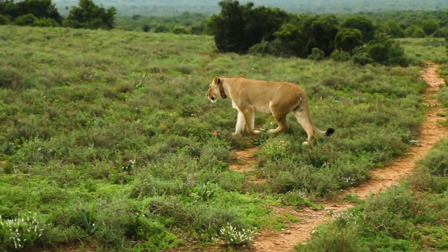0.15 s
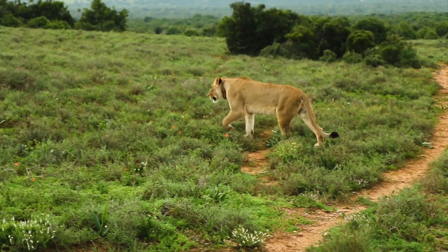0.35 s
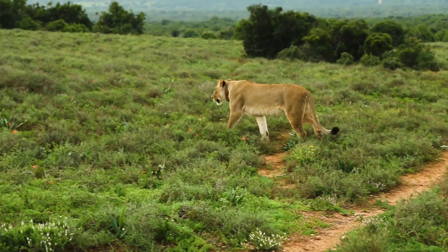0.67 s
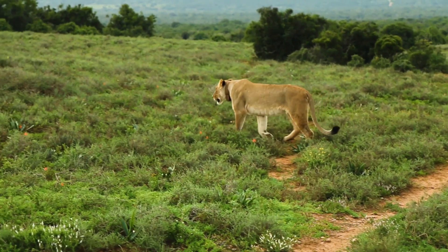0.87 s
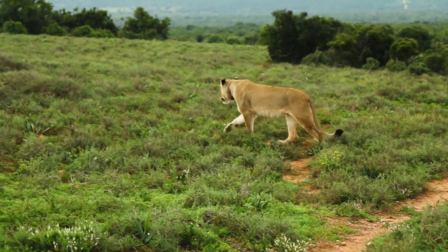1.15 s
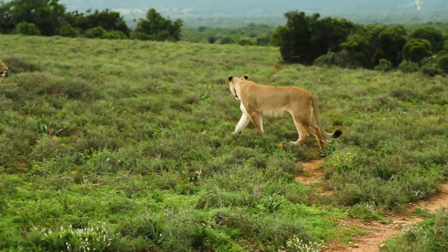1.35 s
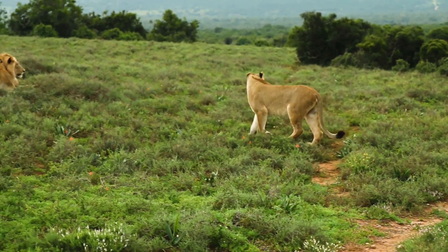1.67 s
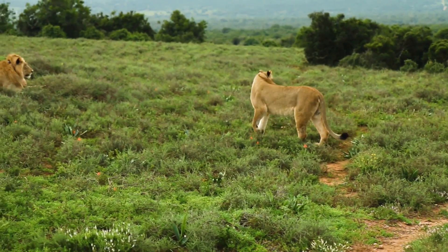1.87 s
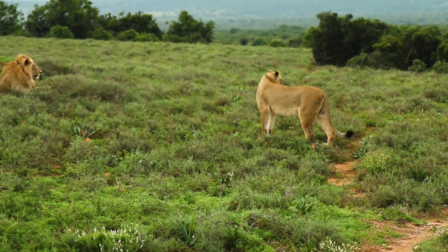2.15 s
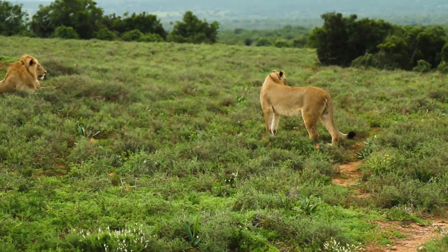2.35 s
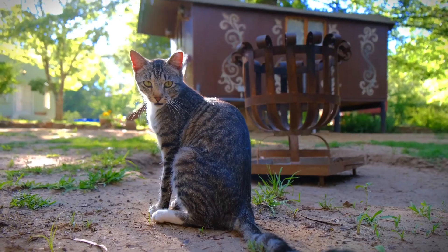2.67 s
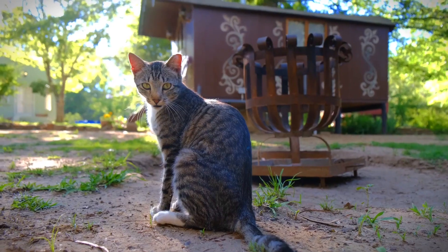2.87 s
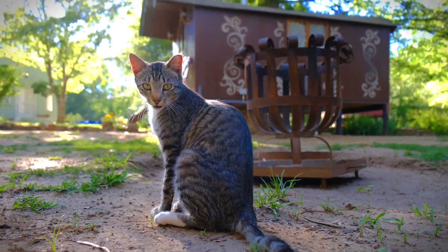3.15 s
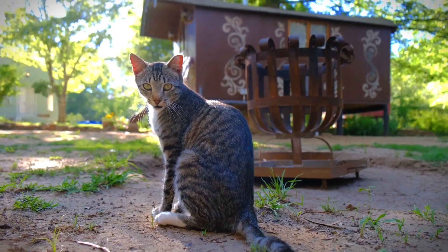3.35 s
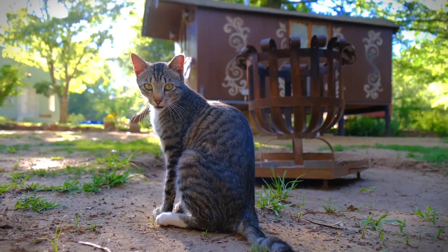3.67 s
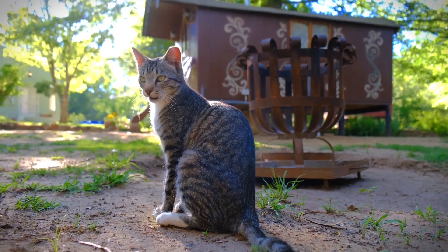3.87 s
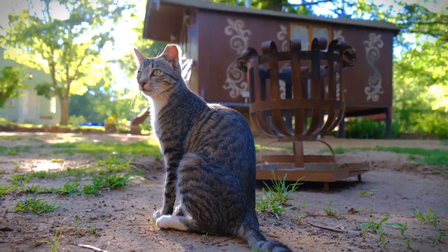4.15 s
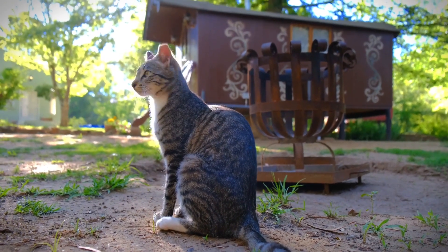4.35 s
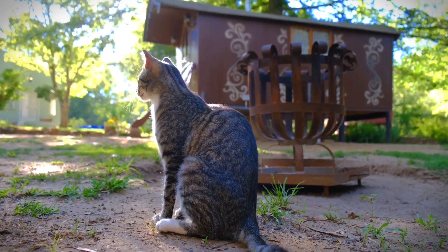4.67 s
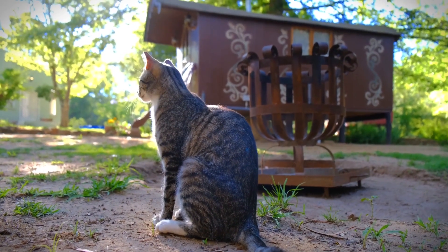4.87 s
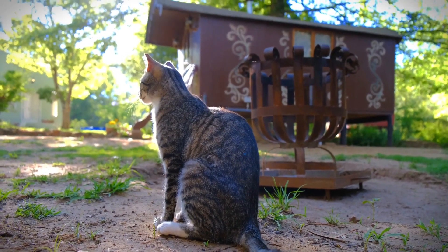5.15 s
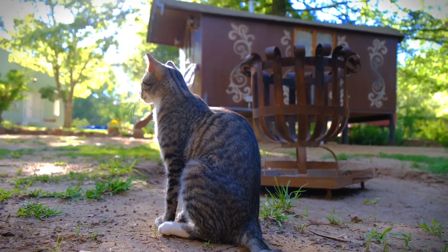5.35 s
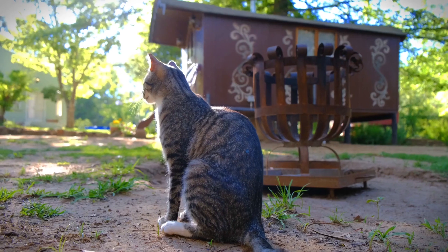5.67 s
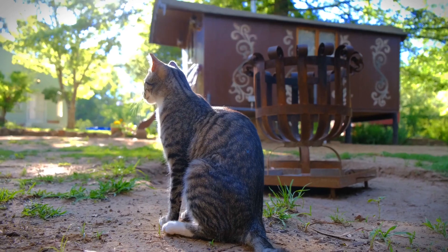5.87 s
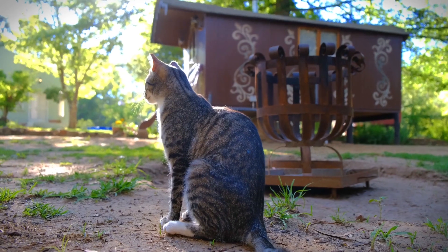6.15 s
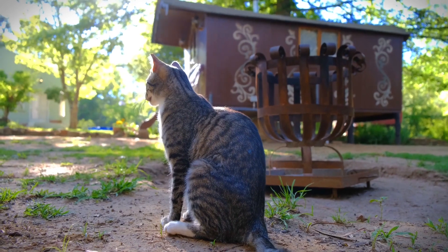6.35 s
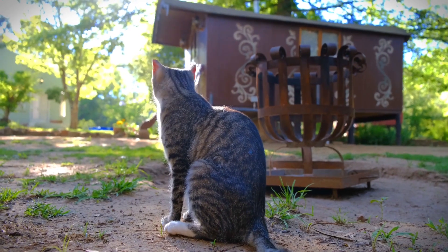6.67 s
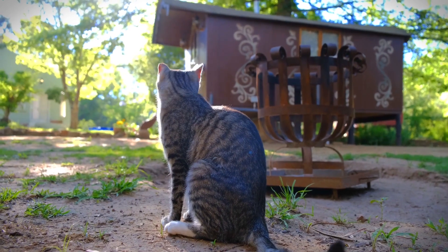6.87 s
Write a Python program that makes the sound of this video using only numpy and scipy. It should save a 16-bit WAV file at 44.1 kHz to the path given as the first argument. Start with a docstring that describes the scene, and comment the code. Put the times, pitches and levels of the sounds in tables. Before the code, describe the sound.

Close, dry growling from a large lioness: rapid fold flutter, hard slaps and noisy breathy rasp, drifting from the right ear to the left. It dies in separate flaps, then a clear gap. A small cat follows in the middle with two drawn-out, slightly hoarse meows, a pause between them, over gated low hum and gentle outdoor hiss.

```python
"""A lion growls twice while moving from right to left: slack folds flapping about 37-51 times a second
pulse the chest resonances and noise in throat and muzzle; hard slaps and three loose flaps are added.
A cat then gives two long meows in the centre, harmonics swept by a mouth resonance, each with an echo.
A low outdoor background of hum, rumble and soft hiss comes and goes with each meow."""
import sys
import numpy as np
from scipy import signal
from scipy.fft import rfft, irfft
from scipy.io import wavfile
from scipy.ndimage import uniform_filter1d, map_coordinates

SR = 44100
rng = np.random.default_rng(int(sys.argv[2]) if len(sys.argv) > 2 else 0)


def dump_mix(stems):
    """Bounce the given channels to the path in sys.argv[1] as a 16-bit WAV at rate SR."""
    frames = np.atleast_2d(stems).T  # one column per channel
    limited = np.clip(frames, -1, 1)  # hard clip at full scale
    pcm = np.round(limited * 32767).astype(np.int16)
    wavfile.write(sys.argv[1], SR, pcm)


N = 308700
T = np.arange(N) / SR


def amp(db):
    """Decibels to amplitude."""
    return 10 ** (np.asarray(db) / 20)


def evened(x):
    """Scale to RMS 1."""
    return x / np.sqrt(np.mean(x ** 2) + 1e-20)


def curves(rows):
    """Each column after start_s, interpolated at every sample."""
    start_s, *columns = np.transpose(rows)
    return [np.interp(T, start_s, column) for column in columns]


def read(points, hz):
    """Table value at hz, interpolated over log frequency."""
    table_hz, value = np.transpose(points)
    return np.interp(np.log(hz + 1), np.log(table_hz), value)


def during(rows, fade_s):
    """One while the table lasts, linear fades outside it."""
    fade_in = np.clip((T - rows[0][0]) / fade_s + 1, 0, 1)
    fade_out = np.clip((rows[-1][0] - T) / fade_s + 1, 0, 1)
    return fade_in * fade_out


def noise(spectrum):
    """Gaussian noise shaped by (hz, relative level_db), RMS 1."""
    gain = amp(read(spectrum, np.fft.rfftfreq(N, 1 / SR)))
    return evened(irfft(rfft(rng.standard_normal(N)) * gain, N))


def wander(hz):
    """Random drift of RMS 1, rolled off steeply above hz."""
    t = T[::20]
    rolloff = 1 + (np.fft.rfftfreq(len(t), t[1]) / hz) ** 4
    drift = irfft(rfft(rng.standard_normal(len(t))) / rolloff, len(t))
    return np.interp(T, t, evened(drift))


def band(x, lo_hz, hi_hz, order):
    """Butterworth bandpass; a tiny sine keeps the filter off denormals."""
    sos = signal.butter(order, [lo_hz, min(hi_hz, SR / 2 - 1)], "band", fs=SR, output="sos")
    return signal.sosfilt(sos, x + 1e-18 * np.sin(np.arange(len(x))))


def resonate(x, hz, width_hz):
    """Double-pole resonance of peak gain 1 following the curve hz: shift down, lowpass, shift back."""
    turn = np.exp(2j * np.pi * np.cumsum(hz * np.ones(len(x))) / SR)
    r = np.exp(-np.pi * width_hz / SR)
    lowpassed = signal.lfilter([(1 - r) ** 2], [1, -2 * r, r * r], x / turn + 1e-18)
    return 2 * (turn * lowpassed).real


def ring(x, modes):
    """Each push in x sets damped modes ringing."""
    t = T[:SR // 10]
    response = sum(amp(level_db) * np.exp(-np.pi * width_hz * t) * np.sin(2 * np.pi * hz * t)
                   for hz, width_hz, level_db in modes)
    return signal.oaconvolve(x, response)[:N]


def pushes(times_s, sizes):
    """One-sample impulses."""
    x = np.zeros(N)
    np.add.at(x, np.clip(np.round(np.asarray(times_s) * SR).astype(int), 0, N - 1), sizes)
    return x


def puffs(x, width_s):
    """Each push becomes a swelling, dying sech puff of height 1."""
    t = T[:SR // 20] - T[SR // 40]
    return signal.oaconvolve(x, 1 / np.cosh(t / width_s), "same")


def steadied(x, span_s):
    """Hold the power near 1 over the span, leaving single flaps free."""
    size = max(int(span_s * SR), 2)
    power = abs(uniform_filter1d(uniform_filter1d(x ** 2, size), size))
    return x / np.sqrt(power + 1e-7 * np.mean(x ** 2))


# lion position: start_s, left_lag_ms, left_minus_right_db
PATH = [(0, 0.82, -4.5), (.45, 0.97, -4.5), (.7, 1, -6), (1.1, 0.75, -4.5), (1.5, 0.22, -1.4),
        (1.7, -0.033, -0.9), (1.9, -0.34, 2.2), (2.4, -0.95, 5.5)]


def lion():
    """The nearer ear hears the lion sooner and louder; the hardest peaks overload softly."""
    voice = growl() + slaps() + last_flaps()
    left_lag_ms, balance_db = curves(PATH)
    gains = np.array([amp(balance_db / 2), amp(-balance_db / 2)])
    shift = left_lag_ms * SR / 2000  # samples, half the lag per ear
    ears = np.array([map_coordinates(voice, [np.arange(N) + side * shift], order=3) for side in (-1, 1)])
    ears = ears * gains / np.sqrt(np.mean(gains ** 2, 0))
    return ears / (1 + (ears / .95) ** 4) ** .25


# growl shape: start_s, mouth_opening_factor, turbulence_0_1, rasp_tilt_db_per_octave
FLAPS = [(0, 1.053, 0.07, 8), (.55, 1.004, 0.18, 2.5), (.75, 1.022, 0.45, 0), (1.05, 1.035, 0.73, 2.5),
         (1.45, 1.066, 0.41, 0.5), (1.65, 1.064, 0.54, 3.5), (1.87, 0.92, 0.3, -6),
         (2.05, 0.969, 0.2, -5.5), (2.3, 1, 0.4, 3.5)]
# fold flapping: start_s, flaps_per_s
FLAP_RATE = [(0, 39.5), (.39, 39.5), (.43, 51), (.48, 38), (.6, 38.5), (.66, 46), (.8, 46.5), (.86, 40),
             (1.0, 36.5), (1.3, 48), (2.3, 48)]
# lion resonances at mouth factor 1: hz, width_hz, level_db
CHEST = [(151.4, 13, -5.5), (190.8, 35, -2), (254, 41, -5)]
THROAT = [(710.7, 140, -1.8), (805.7, 170, -0.4), (971.4, 110, -2.1)]
MUZZLE = [(1630, 131, -5.5), (1852, 810, 0), (2758, 200, 3), (3495, 100, -4), (4550, 940, -8.5),
          (5210, 78, -6), (6046, 120, -10)]
# rising wheeze late in the first growl: start_s, pitch_hz, level_db
WHEEZE = [(1.41, 3000, -41), (1.445, 3460, -31.5), (1.475, 3920, -30), (1.52, 4900, -57.5)]


def growl():
    """Each flap thumps the chest and lets a puff of turbulent air through throat and muzzle."""
    jitter_s, uneven_db, spit_uneven_db = .005, 7.5, 5.5  # jitter at turbulence 1
    roar_width_s, rasp_width_s, span_s = 0.0032, 0.0013, 0.06
    chest_level_db, roar_level_db, rasp_level_db = growl_levels()
    mouth, turbulence, tilt_db = curves(FLAPS)

    turns = np.cumsum(curves(FLAP_RATE)[0]) / SR + .25
    times_s = T[1:][np.diff(np.floor(turns)) > 0]
    chance = rng.standard_normal((len(times_s), 4))
    times_s = times_s + jitter_s * np.interp(times_s, T, turbulence) * chance[:, 0]
    # turbulence evens out the flaps
    flap_turbulence = np.interp(times_s, T, turbulence)
    chance = chance * (1 - 0.62 * flap_turbulence)[:, None]
    flaps = pushes(times_s, amp(uneven_db * chance[:, 1]))
    thumps = pushes(times_s + 0.003, amp(uneven_db * (chance[:, 1] + chance[:, 2]) / 2))
    spit_times_s = times_s + jitter_s * flap_turbulence * chance[:, 3]
    spits = pushes(spit_times_s, amp(spit_uneven_db * (chance[:, 1] - chance[:, 2])))

    air = rng.standard_normal((3, N))
    mouth = mouth * (1 + 0.021 * wander(25.28))  # soft throat shakes
    chest = band(ring(thumps + 0.05 * (turbulence + .5) * air[0], CHEST), 85, 640, order=3)
    throat_puffs = puffs(flaps, roar_width_s) + 0.87 * (turbulence + 0.9)  # puffs plus steady leak
    roar = band(tract(throat_puffs * air[1], THROAT, mouth, give=1.0), 490, 1100, order=3)
    gusts = puffs(spits, rasp_width_s) + 0.66 * (turbulence + 0.52)
    rasp = band(tract(gusts * air[2], MUZZLE, mouth, tilt_db), 1250, 6400, order=18)
    top_hiss = gusts * noise([(5500, -28), (7000, 3), (9500, 3), (11000, -12), (15000, -17)])
    # top hiss falls away faster than the rasp
    top_hiss_db = -22 + 2.8 * (rasp_level_db - rasp_level_db.max())
    rasp_and_hiss = steadied(rasp, span_s) + amp(top_hiss_db) * steadied(top_hiss, span_s)
    wheeze_hz, wheeze_db = curves(WHEEZE)
    wheeze = steadied(resonate(gusts * air[0], wheeze_hz, 730), span_s)

    voice = amp(chest_level_db) * steadied(chest, span_s)
    voice += amp(roar_level_db + 3.68) * steadied(roar, span_s)
    voice += amp(rasp_level_db - 3.5) * rasp_and_hiss
    voice += amp(wheeze_db) * wheeze * during(WHEEZE, 0.012)
    return voice * np.clip((LAST_FLAPS[0][0] - T) / .02, 0, 1)  # silent once the loose flaps start


# two growls: start_s, end_s, release_db_per_s, chest_thump_db, lung_sag_db_per_s
GROWLS = [(0, 1.688, 523.5, -17, 2.5), (1.796, 2.216, 196, -18, 9.5)]
GROWL_ATTACK_DB_PER_S = 340
# push before gating and mix gain: start_s, roar_db, rasp_db
PUSH = [(0, -40, -29), (.3, -36.5, -26.5), (.47, -24, -22), (.61, -23.5, -23.5), (.7, -18, -15.5),
        (1.0, -14.5, -18), (1.17, -15.5, -18), (1.3, -21.5, -20.5), (1.49, -19.5, -22),
        (1.555, -27.5, -28.5), (1.61, -19.5, -19.5), (1.69, -25.5, -30), (1.84, -17.5, -20.5),
        (2.04, -22, -21.5), (2.13, -23.5, -24.5), (2.22, -26.5, -32.5)]


def growl_levels():
    """Chest, roar and rasp in dB: fast swell, chest sagging as the lungs empty, then release."""
    gates_db, chests_db = [], []
    for start_s, end_s, release_db_per_s, chest_db, sag_db_per_s in GROWLS:
        attack_db = GROWL_ATTACK_DB_PER_S * (T - start_s)
        release_db = release_db_per_s * (end_s - T)
        gate_db = np.minimum(np.minimum(attack_db, release_db), 0)
        gates_db.append(gate_db)
        chests_db.append(gate_db + chest_db - sag_db_per_s * (T - start_s))
    roar_db, rasp_db = curves(PUSH) + np.max(gates_db, 0)
    return np.max(chests_db, 0), roar_db, rasp_db


def tract(x, modes, mouth, tilt_db=0, give=0):
    """Lion resonances flickering separately, scaled by mouth opening; give moves the first ones most."""
    n = round(LAST_FLAPS[-1][0] * SR)
    out = np.zeros(N)
    for k, (hz, width_hz, level_db) in enumerate(modes):
        flicker_db = 2.8 * wander(45)
        drive = x * amp(level_db + flicker_db + tilt_db * np.log2(hz / modes[1][0]))
        out[:n] += resonate(drive[:n], hz * mouth[:n] ** (1 + give / 2 ** k), width_hz)
    return out


# hard fold slaps, relative levels: start_s, roar_db, rasp_db
SLAPS = [(0.093, -38, -19), (0.321, -41, -8), (.373, -15, -25), (.463, -21, -11), (.496, -4.5, -6),
         (0.539, -14, -5), (0.641, -22.5, 0), (0.687, -14, -6.5), (0.748, -6, -10), (0.816, -0.5, -6.5),
         (1.513, 0, -31), (1.631, -1, -17.5), (1.851, -3, -16), (1.947, 0, -24), (2.058, -7, -12.5),
         (2.174, -8, -15), (2.215, -8, -17.5)]


def slaps():
    """The folds slam shut: the throat rings and the muzzle spits."""
    width_s = 0.0013
    start_s, roar_db, rasp_db = np.transpose(SLAPS)
    roar = band(ring(pushes(start_s - width_s, amp(roar_db)), THROAT), 840, 1700, order=3)
    spit = puffs(pushes(start_s, amp(rasp_db)), width_s) * rng.standard_normal(N)
    rasp = band(tract(spit, MUZZLE, curves(FLAPS)[0]), 1250, 6400, order=12)
    return amp(-5) * roar + amp(4) * rasp


# loose flaps, relative levels: start_s, level_db
LAST_FLAPS = [(2.367, -13.5), (2.3936, -9.5), (2.4157, -10.5)]
# their resonances: hz, width_hz, level_db
SLACK_THROAT = [(156, 100, 9), (283, 183, 6.5), (690, 190, 10), (970, 150, -41), (1600, 400, -33),
                (2286, 127, -1.5), (4600, 430, -20)]


def last_flaps():
    """With the pressure gone, the folds flap singly, each with a quick rebound."""
    rebound_s, spit_width_s = 0.0016, 0.0044
    start_s, level_db = np.transpose(LAST_FLAPS)
    hits = pushes(start_s, amp(level_db))
    rebounds = pushes(start_s + rebound_s, amp(level_db))
    spit = puffs(rebounds, spit_width_s) * noise([
        (100, 2), (300, 12), (2400, -4.5), (3300, -33), (5000, -10), (6500, -27.0), (9500, -25.5), (11000, -60)])
    body = band(ring(rebounds - 0.21 * hits, SLACK_THROAT), 140, 5800, order=2)
    return amp(-3) * body + amp(-9) * spit


# meow pitch, sags then breaks upward: start_s, pitch_hz
FIRST_PITCH = [(3.12, 607.4), (3.18, 703.5), (3.222, 616), (3.255, 680), (3.282, 712), (3.308, 644),
               (3.35, 648), (3.41, 668), (3.49, 612.5), (3.555, 611.6), (3.588, 586), (3.612, 656.6),
               (3.66, 649), (3.79, 595), (3.83, 627), (3.98, 609), (4.11, 575), (4.185, 529.3)]
SECOND_PITCH = [(5.335, 529.4), (5.41, 559), (5.445, 592), (5.48, 573), (5.51, 610), (5.555, 603),
                (5.59, 623), (5.66, 632.4), (5.70, 609), (5.764, 577.2), (5.79, 603), (6.0, 588.3),
                (6.23, 556), (6.36, 523.6), (6.422, 479)]
# meow shape: start_s, loudness_db, mouth_hz, upper_harmonics_db
FIRST_MOUTH = [(3.12, -48.5, 720, -83), (3.17, -33.5, 720, -74), (3.207, -36, 1700, -55),
               (3.22, -22.5, 1830, -48.5), (3.245, -28, 1864, -49), (3.34, -20, 1963, -43.5),
               (3.41, -22.5, 1598, -41), (3.49, -19.5, 1797, -46), (3.585, -8, 1217, -41),
               (3.64, -18.5, 1061, -38.5), (3.77, -21, 690, -51.5), (3.805, -23, 690, -51.5),
               (3.83, -24.5, 956, -49), (4.05, -26.5, 1152, -66), (4.102, -30.5, 1077, -62),
               (4.185, -34.5, 880, -66)]
SECOND_MOUTH = [(5.335, -45, 1290, -70.5), (5.352, -27.5, 1200, -55), (5.45, -29.5, 2130, -42),
                (5.53, -29, 1480, -43.5), (5.62, -20.5, 1780, -33.5), (5.70, -17, 1360, -48),
                (5.761, -4.5, 1155, -41.5), (5.779, -16.5, 1130, -41), (5.88, -22.5, 1000, -53),
                (6.25, -19.5, 930, -44.5), (6.42, -21, 820, -47)]
# strain release: break_s, lasting_strain_0_1, strained_air_db
BREAKS = [(3.632, 0.37, -43.5), (5.779, 0.33, -45)]
# cat folds catch as they start, slip or stop, relative levels: start_s, level_db
CATCHES = [(3.209, -37), (3.814, -45), (4.18, -38.5), (5.345, -36.5), (6.424, -30.5)]
# metallic sheen centres: hz, level_db
SHEEN = [(3915, -29.5), (4310, -39.5)]


def cat():
    """Two meows with fold catches, echo and a metallic sheen mirroring harmonics about two carriers."""
    voice = meow(FIRST_PITCH, FIRST_MOUTH, *BREAKS[0]) + meow(SECOND_PITCH, SECOND_MOUTH, *BREAKS[1])
    start_s, level_db = np.transpose(CATCHES)
    catch_puffs = puffs(pushes(start_s, amp(level_db)), 0.0049)
    voice = voice + catch_puffs * noise([(200, -10.5), (500, -5.5), (1300, 4.5), (2400, -26.5), (5000, -65)])
    carriers = sum(amp(carrier_db) * np.cos(2 * np.pi * hz * T) for hz, carrier_db in SHEEN)
    sheen = band(voice * carriers, 2400, 5250, order=16)
    return voice + sheen + amp(-25) * echo(voice)


# head colour of harmonics 1-4, then 5-8: hz, level_db
CAT_LOW = [(520, -3.5), (650, 0), (1200, 3), (1800, 1), (2150, 0), (2550, 4.5)]
CAT_TOP = [(2300, 1.5), (2850, -10), (3200, 3.5), (3500, -12), (4100, -33.5), (5000, -19), (6000, -61.5)]
RELAX_S = .09
MOUTH_HZ, MOUTH_WIDTH_HZ = 1200, 76  # half-open mouth; width grows with mouth_hz
SOFT_TILT_DB, STRAIN_TILT_DB = -14, 14.5  # per octave: relaxed, added at full strain
SOFT_BREATH_DB = -56  # hoarseness of the relaxed voice
ONSET_RASP_DB, ONSET_RASP_S = 9, 0.56  # extra hoarseness while the folds settle
FULL_VOICE_DB = -22.5  # below this loudness, hoarseness fades with the voice
NASAL_START, NASAL_END, NASAL_GLIDE_S = 1.3, 0.86, 0.18  # thin to open: factor on CAT_TOP frequencies


def meow(pitch, shape, break_s, lasting_strain, strained_db):
    """Harmonics under a mouth resonance; strain brightens them, adds flutter and lets air hiss through."""
    on = during(shape, .008)
    live = on > 0
    t = T[live]
    hz, loudness_db, mouth_hz, top_db = (c[live] for c in curves(pitch) + curves(shape))
    strain = lasting_strain + (1 - lasting_strain) * np.exp(-np.maximum(t - break_s, 0) / RELAX_S)
    hoarse_db = SOFT_BREATH_DB + (strained_db - SOFT_BREATH_DB) * strain
    hoarse_db = hoarse_db + ONSET_RASP_DB * np.exp((t[0] - t) / ONSET_RASP_S)
    hoarse = amp(hoarse_db + np.minimum(loudness_db - FULL_VOICE_DB, 0))
    nasal = NASAL_END + (NASAL_START - NASAL_END) * np.exp((t[0] - t) / NASAL_GLIDE_S)
    hz = hz * (1 + (0.0007 + 0.7 * hoarse) * wander(80)[live])
    turn = 2 * np.pi * np.cumsum(hz) / SR

    low = np.arange(1, 5)[:, None]
    low_hz = low * hz
    gains = amp((SOFT_TILT_DB + STRAIN_TILT_DB * strain) * np.log2(low) + read(CAT_LOW, low_hz))
    width_hz = MOUTH_WIDTH_HZ * mouth_hz / MOUTH_HZ
    gains = gains / abs(mouth_hz ** 2 - low_hz ** 2 + 1j * low_hz * width_hz)
    sizes = list(amp(loudness_db) * gains / np.linalg.norm(gains, axis=0))
    sizes += [amp(top_db + read(CAT_TOP, k * hz / nasal)) for k in range(5, 9)]

    voice = np.zeros(N)
    for k, size in enumerate(sizes, 1):
        flutter = evened(band(rng.standard_normal(len(turn)), 26, 91, order=2))
        # higher harmonics are less steady
        waver = amp(2.72 * np.log2(max(k / 2, 1)) * wander(18)[live])
        # k * k: scattered phases keep the wave from peaking
        tone = np.sqrt(2) * np.cos(k * turn + k * k)
        voice[live] += size * waver * (1 + 7 * hoarse * flutter) * tone

    breath = noise([(300, -24), (650, -11.5), (950, -6), (1300, 8.5), (1900, 6.0), (2700, 0.0),
                    (3400, -7), (3900, -16.5), (5000, -34), (5600, -50.0)])
    mouth_air = evened(band(resonate(rng.standard_normal(len(t)), mouth_hz, 650), 900, 2900, order=4))
    air = amp(-11) * breath[live] + amp(-4.0) * strain * mouth_air
    # air pulses with the folds
    voice[live] += hoarse * air * amp(1.5 * wander(40))[live] * (1 + .8 * np.cos(turn))
    return voice * on


def echo(x):
    """Diffuse decaying-noise tail in which loud notes hang on and beat with the next pitch."""
    t60_s, delay_s = 0.28, .012
    t = T[:SR]
    tail = band(rng.standard_normal(SR), 380, 2500, order=2) * amp(-60 * t / t60_s) * (t > delay_s)
    return signal.fftconvolve(x, tail / np.linalg.norm(tail))[:N]


# background spectrum, relative per hz: hz, level_db
AIR = [(25, 4.5), (60, -0.5), (80, -5.5), (160, -10), (280, -15.5), (600, -17), (1200, -23), (2500, -29),
       (4500, -43), (6500, -78)]
# background during each meow, before the hum is added: start_s, level_db
FIRST_AIR = [(2.98, -52.5), (3.4, -47), (3.63, -47), (3.8, -51), (4.2, -58), (4.33, -73)]
SECOND_AIR = [(5.33, -47.5), (5.7, -46), (5.849, -49.5), (5.971, -46.5), (7, -56.5)]


def background():
    """Phase-wandering low hum plus wavering rumble and soft hiss, gated around each meow."""
    hum_hz, hum_db = 55.6, -3
    hum = np.sqrt(2) * np.sin(2 * np.pi * hum_hz * T + .7 * wander(4))
    air = band(noise(AIR), 15, 8000, order=2) * amp(1.2 * wander(8))
    level = sum(amp(curves(rows)[0]) * during(rows, 0.0045) for rows in (FIRST_AIR, SECOND_AIR))
    return (air + amp(hum_db) * hum) * level


def scene():
    """Stereo lion plus centred cat and background."""
    return lion() + cat() + background()


EDGE_HZ = 15700


def record(dry):
    """Linear-phase lowpass at EDGE_HZ."""
    lowpass = signal.firwin(511, EDGE_HZ, window=("kaiser", 9), fs=SR)
    return signal.oaconvolve(dry, lowpass[None], "same")


dry = scene()
out = record(dry)
dump_mix(out)
```